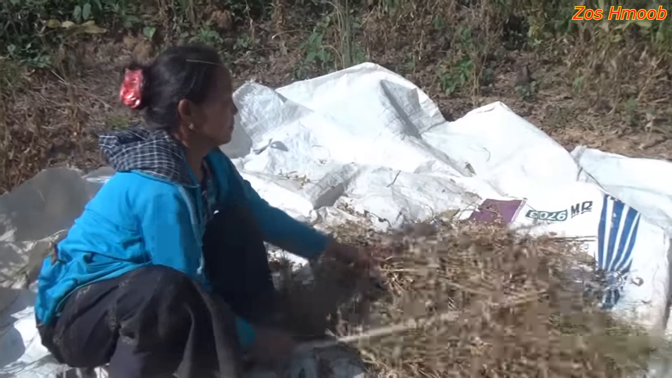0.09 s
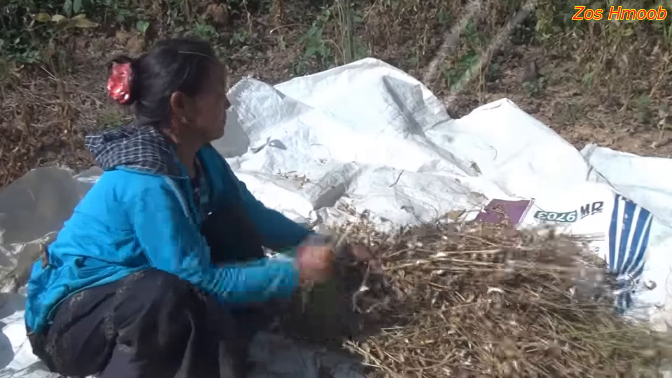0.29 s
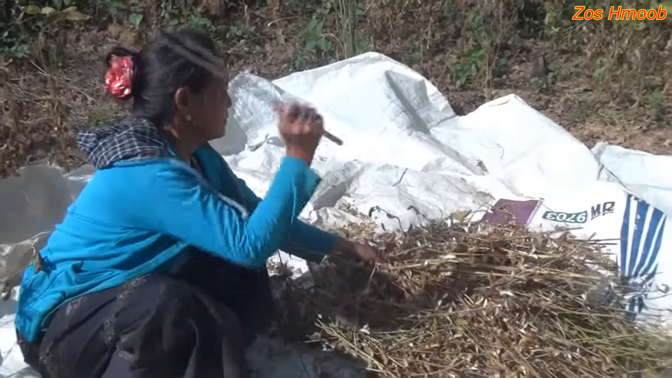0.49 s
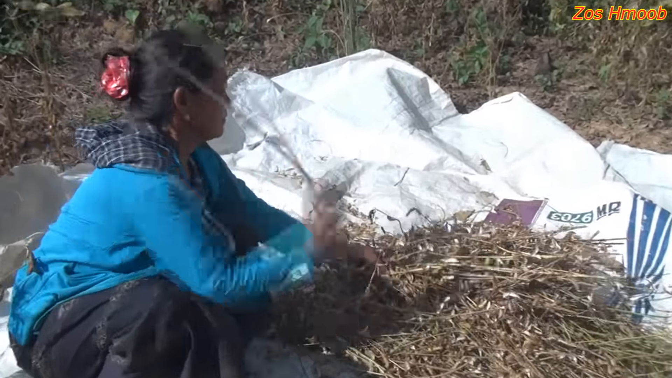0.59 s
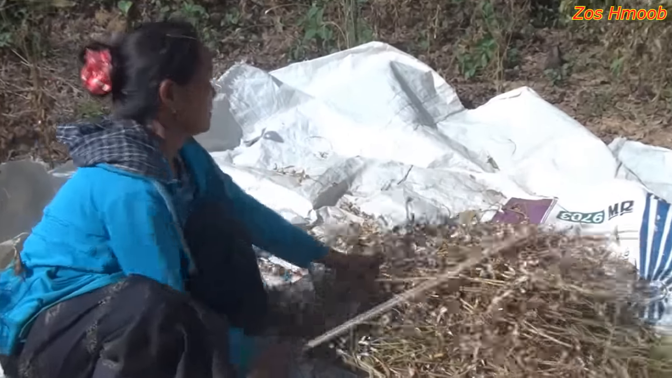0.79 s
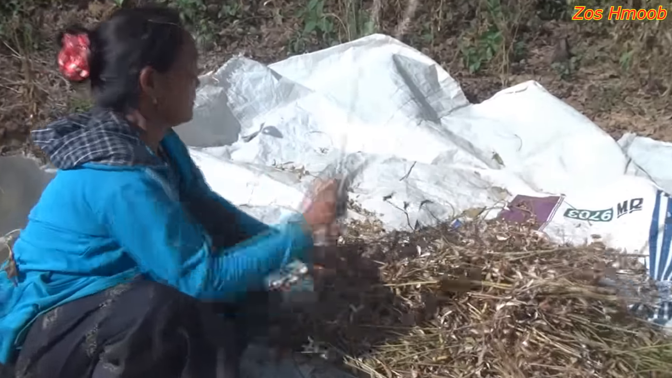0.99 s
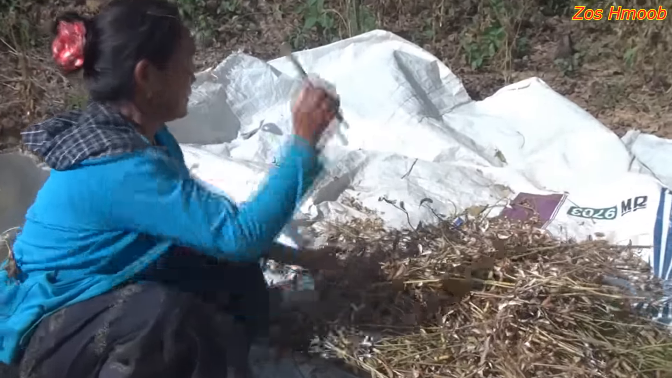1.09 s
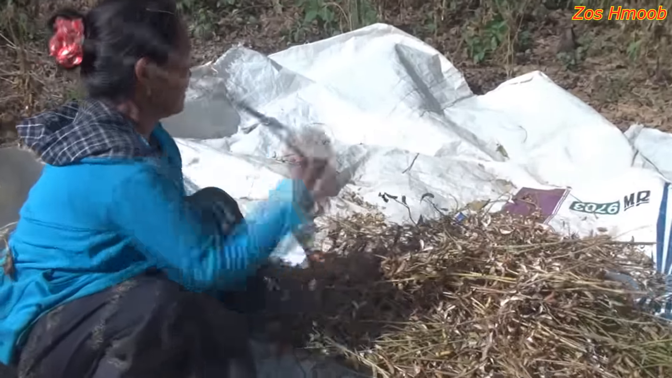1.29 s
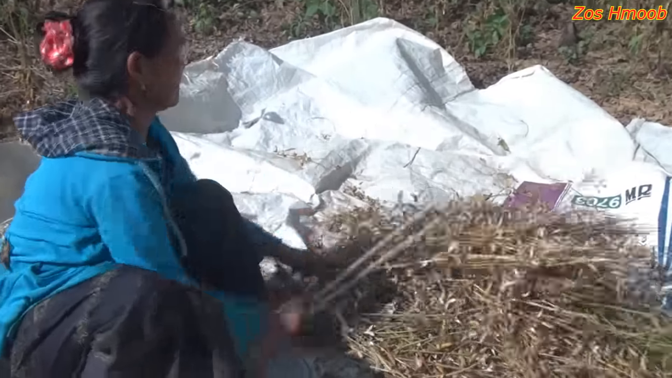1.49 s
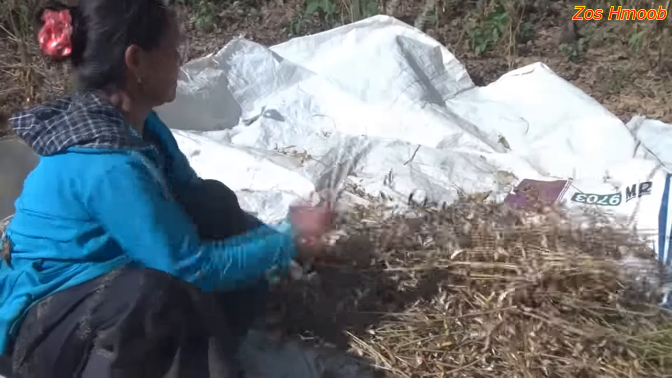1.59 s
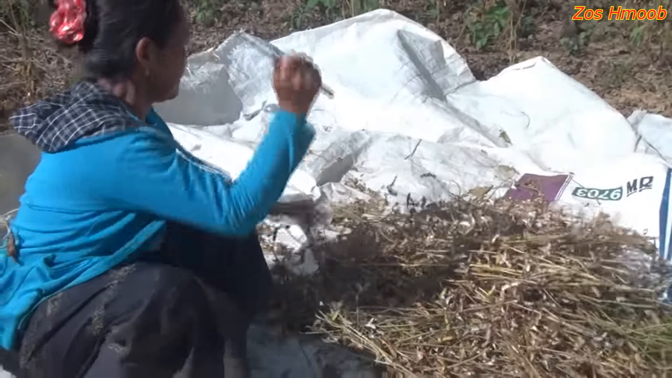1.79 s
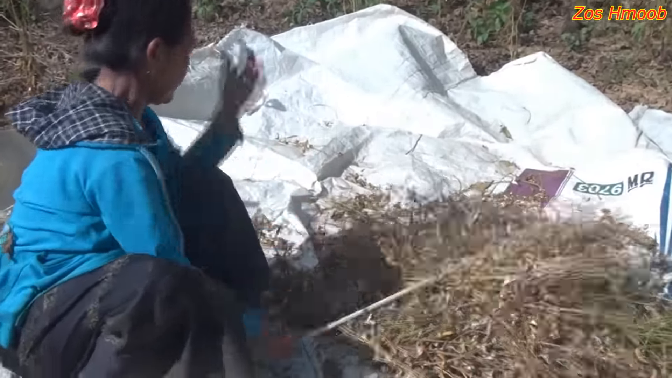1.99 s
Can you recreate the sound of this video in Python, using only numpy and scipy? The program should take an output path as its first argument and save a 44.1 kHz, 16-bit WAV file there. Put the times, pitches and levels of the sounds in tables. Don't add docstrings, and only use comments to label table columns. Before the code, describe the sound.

Three sharp stick blows crack a heap of dried stalks, with crackling rustle and faint insects between

```python
import sys
import numpy as np
from scipy import signal
from scipy.fft import rfft, irfft, next_fast_len
from scipy.io import wavfile
from scipy.ndimage import map_coordinates

SR = 44100
rng = np.random.default_rng(int(sys.argv[2]) if len(sys.argv) > 2 else 0)


def master_out(mix):
    frames = np.transpose(np.atleast_2d(mix))
    ceiling = np.clip(frames, -1, 1)
    pcm = np.round(ceiling * 32767).astype(np.int16)
    wavfile.write(sys.argv[1], SR, pcm)


def boost(x):
    u = np.asarray(x, float) / 20
    return 10 ** u


N = 88200
T = np.arange(N) / SR

# (time [s], crack level [dB], crack rise [s], shower level [dB], shower t60 [s])
BLOWS = [
    (0.2114, -13.5, 0.0017, -19.5, 0.26),
    (0.822, -15, 0.0024, -20.5, 0.3),
    (1.5371, -15, 0.0029, -23, 0.3),
]
# (time [s], level [dB], t60 [s])
SLAPS = [
    (.2091, -20, 0.015),
    (0.2147, -12.5, .02),
    (.2235, -22, .025),
    (0.827, -18.5, 0.032),
    (1.5397, -14, 0.0089),
    (1.544, -18, 0.022),
]
# (time [s], level [dB], t60 [s])
THUMPS = [
    (0.21, -36.5, .13),
    (.23, -45.5, 0.29),
    (.823, -34, 0.1),
    (.839, -40, 0.41),
    (1.539, -38, 0.045),
    (1.557, -32.5, 0.082),
]
# (frequency [Hz], level [dB])
CRACK_COLOUR = [(290, -79), (500, -24), (1370, -27), (3550, 0), (5510, -2), (12300, -0.5), (15100, -4),
                (15800, -35), (16500, -51)]
SHOWER_COLOUR = [(240, -16.5), (400, -17), (1150, -4.5), (1990, 0.5), (2320, -0.5), (4980, 1.5),
                 (10500, 1.5), (15700, -10.5), (16500, -68)]
THUMP_COLOUR = [(40, -28), (90, -7), (250, -4), (650, 2.5), (1200, -2.5), (2500, -6), (5000, -49)]
# (start [s], end [s], top pitch [Hz], level [dB], air noise over tone [dB])
SWISHES = [
    (.13, 0.204, 252, -49.5, 2),
    (0.743, 0.807, 259.8, -46, 2.5),
    (1.456, 1.539, 262.5, -42.5, -5.5),
]
# (frequency [Hz], level [dB])
AIR_COLOUR = [(60, -12), (130, 0), (220, -0.5), (800, -7.5), (2000, -9.5), (6000, -16.5), (16000, -28)]
# (time [s], peak level [dB], frequency [Hz])
SNAPS = [(.0064, -21.5, 10000), (.0352, -22, 8500), (.0484, -21.5, 8100), (.0536, -24, 9100),
         (.0628, -23, 7650), (.0914, -29, 8150), (.1078, -27, 6500), (.141, -27.5, 8000), (.36, -33, 9000),
         (.4043, -29.5, 9900), (.731, -38.5, 7200), (.9576, -27, 8000), (1.2285, -52, 6100),
         (1.3875, -36, 9500), (1.452, -38, 7050), (1.6228, -23.5, 7600), (1.631, -19, 7900),
         (1.755, -38, 4250), (1.8204, -42, 4620)]
# (time [s], peak level [dB], frequency [Hz])
PODS = [(.0224, -30, 10160), (.265, -23.5, 5430), (.3214, -31.5, 4270), (.3294, -36, 10200),
        (.3344, -30, 10400), (.3394, -40, 9900), (.351, -33, 4330), (.4998, -27, 4600), (.507, -36.5, 4400),
        (.515, -38.5, 4430), (.5288, -46, 4600), (1.1139, -49, 4930), (1.1872, -39, 7950),
        (1.2486, -43, 11100), (1.2564, -45, 10800), (1.3249, -38.5, 4300), (1.3327, -42, 4420),
        (1.3524, -45, 4800), (1.4097, -38.5, 9900), (1.417, -45, 9500), (1.4491, -39.5, 4000),
        (1.7784, -46, 4170)]
# (time [s], peak level [dB], frequency [Hz])
KNOCKS = [(.137, -40.5, 800), (.8255, -11, 3040), (.881, -20.5, 1900), (.906, -23.5, 1830),
          (.914, -38, 1500), (.974, -35.5, 1620), (1.118, -54, 795), (1.142, -37.5, 2500),
          (1.148, -40, 3400), (1.178, -43, 1900), (1.332, -41, 1780), (1.417, -40, 1995),
          (1.433, -53, 2380), (1.4435, -31, 2140), (1.453, -36.5, 2100), (1.544, -24.5, 750),
          (1.559, -20, 780)]
# (time [s], peak level [dB], frequency
# [Hz])
CRACKLES = [(.0005, -28.5, 11000), (.0145, -34, 10600), (.0175, -28, 9500), (.042, -38, 11000),
            (.0765, -30, 10400), (.083, -43, 6000), (.0845, -31, 10000), (.0895, -27, 8950),
            (.094, -33, 7000), (.1205, -43, 5000), (.1325, -35, 4670), (.1685, -38, 11500),
            (.181, -39, 5560), (.195, -37, 9000), (.275, -22, 4350), (.286, -27, 11000), (.314, -34, 4700),
            (.373, -39, 8500), (.448, -39, 6500), (.459, -41, 11000), (.5, -33.5, 5500),
            (.5003, -37.5, 9000), (.59, -47, 8500), (.672, -44, 10110), (1.1148, -45, 5100),
            (1.125, -46, 800), (1.134, -45, 8000), (1.1445, -42, 4500), (1.1505, -37.5, 3300),
            (1.154, -43, 3660), (1.165, -46, 1200), (1.169, -47.5, 780), (1.196, -45, 8000),
            (1.207, -56, 1200), (1.223, -42, 9500), (1.229, -48, 3800), (1.23, -48, 1700),
            (1.2415, -51, 4200), (1.292, -47, 5680), (1.3185, -43, 4400), (1.337, -43, 4200),
            (1.3435, -40, 4600), (1.3745, -47, 1440), (1.382, -46, 1600), (1.393, -52, 2000),
            (1.404, -43, 2200), (1.406, -41, 4300), (1.4195, -37, 2040), (1.425, -44, 1090),
            (1.434, -42, 2370), (1.4495, -37.5, 8500), (1.4525, -48, 4120), (1.455, -44, 2500),
            (1.457, -38, 3500), (.2175, -25, 760), (.2135, -23, 1900), (.8235, -13.5, 6100),
            (1.544, -7.5, 9050), (1.917, -48, 10500), (1.976, -48, 5000)]
# (time [s], level [dB], brightness [no unit])
STIR = [(0, -39.5, 5), (.13, -40, 4), (.155, -45, -0.3), (.33, -44.5, -2), (.47, -48.5, -1.4),
        (0.538, -57.5, -3), (.71, -58.5, -2.2), (.73, -45.5, 5), (.75, -57, -3.5), (.82, -57, -5),
        (.9, -47, -1), (1.03, -48.5, -2), (1.08, -56, -2.5), (1.25, -52.5, -0.5), (1.29, -59.5, -2.5),
        (1.365, -59, -3.5), (1.455, -54, -3.5), (1.47, -59.5, -4), (1.68, -53.5, -4), (1.819, -48, -1),
        (1.881, -59.5, 10)]
# (frequency [Hz], level [dB])
RUSTLE_COLOUR = [(120, -63), (200, -32), (354, -9), (584, -13), (892, -8), (1240, -6), (9140, -1),
                 (15000, -5.5), (16500, -76)]
# (time [s], cricket level [dB], far insect level [dB])
INSECTS = [
    (0, -3, 0),
    (0.499, -3, -7),
    (.55, 1, -9),
    (.8, 1, 1),
    (1.05, -4, -3),
    (1.3, 2.5, -2),
    (1.75, 0, 2),
    (1.9, -2, -1),
    (2, 0, -6),
]
# (frequency [Hz], level [dB])
FLOOR_COLOUR = [(15, -30), (25, -14), (90, -9.5), (330, -7), (483, -10.5), (687, -6.5), (1280, -7.5),
                (8600, -16.5), (15200, -43), (16500, -54)]
# (frequency [Hz], level difference [dB])
NEAR_BALANCE = [(60, -12), (150, -14), (380, -9), (950, -8.5), (2380, -5.5), (5980, -4), (15000, -13)]
FAR_BALANCE = [(60, -7.5), (180, -12.5), (550, -10), (1650, 4), (4970, -1), (15000, -6)]
# (frequency [Hz], likeness [0 to 1])
NEAR_ALIKE = [(60, .8), (180, .93), (550, .85), (1650, .75), (4970, .85), (15000, .88)]
FAR_ALIKE = [(60, 0.75), (180, 0.91), (550, 0.01), (1650, 0.052), (4970, 0.37), (15000, 0.29)]


def unit(x):
    return x / np.sqrt(np.mean(x ** 2) + 1e-20)


def along(points, hz):
    f, v = np.transpose(points)
    return np.interp(np.log(hz + 1), np.log(f + 1), v)


def wobble(rate):
    return map_coordinates(rng.standard_normal(int(N * rate / SR) + 4), [T * rate])


def filtered(x, response):
    size = next_fast_len(N + 8192)
    return irfft(rfft(x, size) * response(np.fft.rfftfreq(size, 1 / SR)), size)[..., :N]


def burst(start, rise, t60):
    t = np.maximum(T - start, 0)
    return (1 - np.exp(-(t / rise) ** 2)) * boost(-60 * t / t60)


def noisy(envelope, spectrum, grit_db, grit_rate, alike=NEAR_ALIKE):
    pair = rng.standard_normal((2, N)) * unit(boost(grit_db * wobble(grit_rate)))

    def colour(hz):
        turn = np.arccos(np.clip(along(alike, hz), -1, 1)) / 2
        return unit(boost(along(spectrum, hz))) * [np.cos(turn), np.sin(turn)]

    mid, side = filtered(pair * envelope, colour)
    return np.array([mid + side, mid - side])


def placed(pair, balance):
    return filtered(pair, lambda hz: boost(np.outer([.5, -.5], along(balance, hz))))


def crack():
    envelope = sum(boost(db) * burst(s, rise, 0.076) for s, db, rise, _, _ in BLOWS)
    envelope = envelope + sum(boost(db) * burst(s, 0.0019, t60) for s, db, t60 in SLAPS)
    return noisy(envelope, CRACK_COLOUR, grit_db=1.9, grit_rate=1800)


def shower():
    envelope = sum(boost(db) * burst(s, 0.0048, t60) for s, _, _, db, t60 in BLOWS)
    return noisy(envelope, SHOWER_COLOUR, grit_db=1.2, grit_rate=900)


def thump():
    envelope = sum(boost(db) * burst(s, 0.003, t60) for s, db, t60 in THUMPS)
    return noisy(envelope, THUMP_COLOUR, grit_db=2.2, grit_rate=250)


def butt_slap():
    hz = 4000
    colour = [(hz / 2, -12), (hz, 0), (hz * 2, -18), (16000, -40)]
    envelope = boost(-20.5) * burst(1.553, rise=0.0039, t60=0.081)
    return noisy(envelope, colour, grit_db=3.0, grit_rate=900)


def swish():
    slow_pitch = .5
    pitch, gain, air = np.zeros((3, N))
    for start, end, hz, db, air_db in SWISHES:
        swing = np.clip((T - start) / (end - start), 0, 1)
        speed = np.sin(np.pi / 2 * np.minimum(1.25 * swing, 1)) ** 2
        pitch = np.where(T > start, hz * (slow_pitch + (1 - slow_pitch) * speed), pitch)
        fade = np.exp(-(np.maximum(T - end, 0) / .008) ** 2)
        swell = boost(db) * swing ** 2.7 * fade
        gain = gain + swell
        air = air + swell * boost(air_db)
    phase = 2 * np.pi * np.cumsum(pitch * (1 + .09 * wobble(90))) / SR
    tone = np.sqrt(2) * gain * boost(2 * wobble(80)) * np.sin(phase)
    return tone + noisy(air, AIR_COLOUR, grit_db=2.2, grit_rate=150)


def snaps(rows, q, t60, trim_db):
    size = 2048
    out = np.zeros((2, N + size))
    t, f = np.arange(size) / SR, np.fft.rfftfreq(size, 1 / SR)
    puff = boost(-60 * t / max(t60, .002)) * (1 - np.exp(-t / 0.0001))
    for s, db, hz in rows:
        a, b = rng.standard_normal((2, size)) * puff
        damping = 1j * f * hz / q
        resonance = (damping / (hz ** 2 - f ** 2 + damping)) ** 2
        ring = irfft(rfft([a + 0.22 * b, a - 0.61 * b]) * resonance)
        start = round(s * SR)
        out[:, start:start + size] += boost(db + trim_db) * ring / np.abs(ring).max() * 2
    return out[:, :N]


def splinters(activity, count, hz, spread, cycles, size_db):
    length = 200
    t = np.arange(length) / SR
    draw = rng.random((count, 5))
    pitch = np.clip(hz * np.exp(spread * rng.standard_normal(count)), 300, 15000)[:, None]
    at = (draw[:, 0] * (N - length)).astype(int)
    size = boost(-size_db * np.log(draw[:, 1:2] + 0.018))
    ring = np.sin(2 * np.pi * pitch * t) * np.exp(-t * pitch / cycles)
    ring = ring * size * (1 - np.exp(-t * pitch))
    ring = ring / np.sqrt((ring ** 2).sum() / N) * activity[at][:, None]
    lag = (draw[:, 2] * 3).astype(int)
    pan = boost(0.58 * (2 * draw[:, 3:4] + 2.0))

    def scattered(start, gain):
        places = start[:, None] + np.arange(length)
        return np.bincount(places.ravel(), (ring * gain).ravel(), N + 8)[:N]

    return np.array([scattered(at, pan), scattered(at + lag, 1 / pan)])


def rustle():
    s, level_db, tilt = np.transpose(STIR)
    busy = boost(np.interp(T, s, level_db) + wobble(40.11))
    tilt = np.interp(T, s, tilt)
    dull_colour = [(hz, db - 3 * np.log2(hz / 4000)) for hz, db in RUSTLE_COLOUR]
    bright = noisy(busy * boost(-6.5), RUSTLE_COLOUR, grit_db=2.3, grit_rate=500)
    dull = noisy(busy * boost(-13.0 - 4.24 * tilt), dull_colour, grit_db=4.0, grit_rate=200)
    ticks = splinters(busy, count=2500, hz=7000, spread=.4, cycles=4.5, size_db=2.5)
    return bright + dull + boost(-6) * ticks


def insects():
    cricket_hz, far_hz, width_hz, trill_hz = 7200, 8500, 104, 29.3
    cricket_db, far_insect_db = -65, -67.5

    def whistle(hz, channels):
        noise = rng.standard_normal((channels, N))
        return unit(filtered(noise, lambda f: np.exp(-((f - hz) / width_hz) ** 2)))

    a, b = whistle(cricket_hz, 2)
    far = whistle(far_hz, 2)
    s, near_db, far_db = np.transpose(INSECTS)
    pulse = 1 + .35 * np.cos(2 * np.pi * trill_hz * (T - 0.46))
    pulse = pulse / (1 + np.exp((T - 1.79) / .02))
    level = boost(cricket_db + np.interp(T, s, near_db)) * boost(0.68 * wobble(5.3))
    cricket = level * pulse * np.array([a + .3 * b, a - 0.27 * b])
    return cricket + boost(far_insect_db + np.interp(T, s, far_db)) * far


def farm_floor():
    return noisy(boost(-59 + 1.2 * wobble(7.73)), FLOOR_COLOUR, grit_db=1.0, grit_rate=60.1, alike=FAR_ALIKE)


def scene():
    heap = crack() + shower() + thump() + butt_slap() + swish()
    heap = heap + snaps(SNAPS, q=1.6, t60=.0055, trim_db=-8.5)
    heap = heap + snaps(PODS, q=4.5, t60=.018, trim_db=-5.5)
    heap = heap + snaps(KNOCKS, q=.9, t60=.011, trim_db=-6.5)
    heap = heap + snaps(CRACKLES, q=2.1, t60=.009, trim_db=-7)
    heap = heap + rustle()
    farm = insects() + farm_floor()
    return placed(heap, NEAR_BALANCE) + placed(farm, FAR_BALANCE)


def roll_off(x):
    return signal.sosfilt(signal.butter(12, 16800, fs=SR, output="sos"), x)


def record(dry):
    ceiling, low_cut_hz, band_top_hz, band_drop_db = .95, 45, 15900, -34
    rounded = dry / (1 + np.abs(dry / ceiling) ** 4) ** (1 / 4)

    def response(hz):
        low_cut = hz ** 2 / (hz ** 2 + low_cut_hz ** 2)
        return low_cut * boost(band_drop_db * (hz > band_top_hz))

    mix = filtered(rounded, response)
    return roll_off(mix)


dry = scene()
out = record(dry)
master_out(out)
```